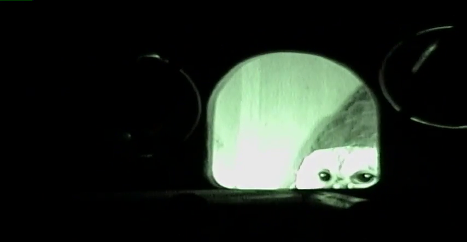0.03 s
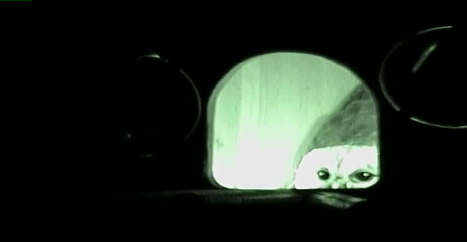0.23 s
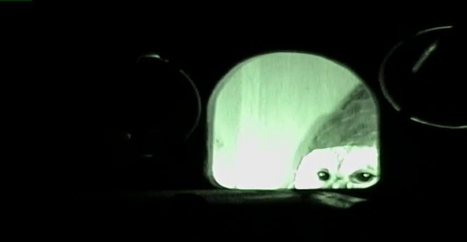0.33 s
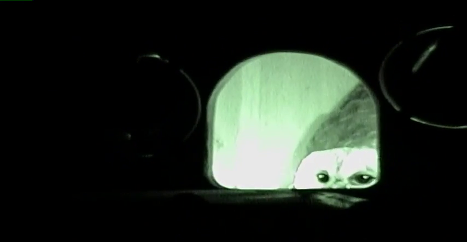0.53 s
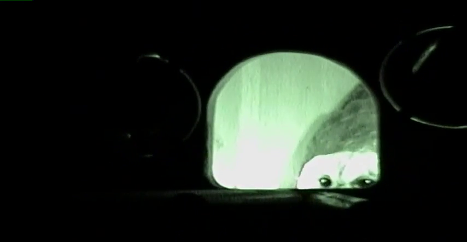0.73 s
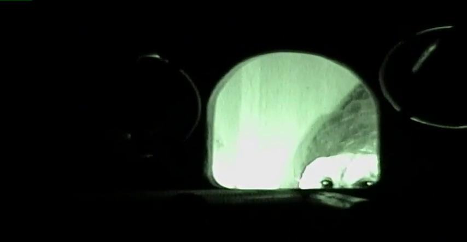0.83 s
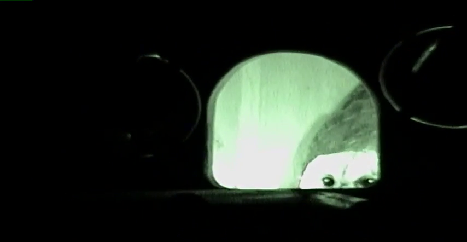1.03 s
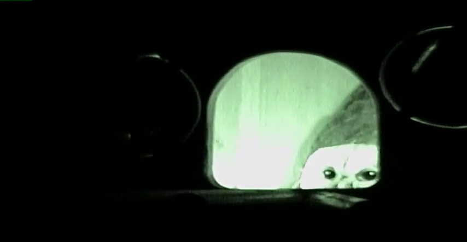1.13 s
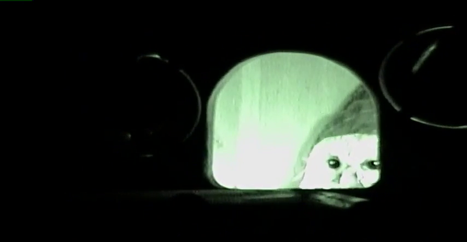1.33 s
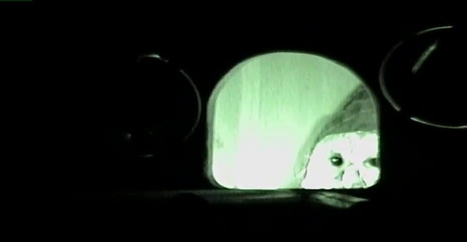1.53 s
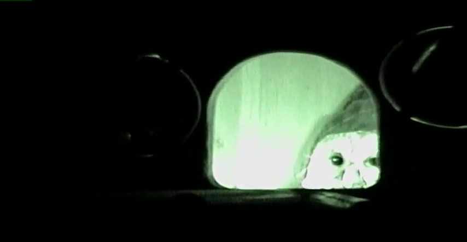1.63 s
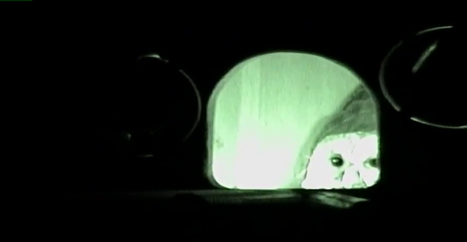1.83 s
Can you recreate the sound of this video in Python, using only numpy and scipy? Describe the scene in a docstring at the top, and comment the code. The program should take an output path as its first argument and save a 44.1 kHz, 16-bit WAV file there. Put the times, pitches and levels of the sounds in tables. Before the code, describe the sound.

An owl hoots right at the microphone in a nest box: one short note, then a longer call that rises, distorts and wavers as it falls. A faint electrical buzz, low rumble and hiss continue underneath.

```python
"""Mains buzz, a low rumble and hiss are there from the start. At 0.2 s an owl hoots right at the
microphone of a nest box: a short arched note, its voice pulses ringing the throat and the box.
At 0.4 s a long call rises and overloads the small narrow-band camera, which squares off the wave.
The call falls away wavering, and after 1 s only the buzz, the rumble and the easing hiss remain."""
import sys
import numpy as np
from scipy import signal
from scipy.fft import rfft, irfft, next_fast_len
from scipy.io import wavfile
from scipy.ndimage import map_coordinates

SR = 44100
rng = np.random.default_rng(int(sys.argv[2]) if len(sys.argv) > 2 else 0)


def file_out(sig):
    """Save sig as 16-bit WAV at sys.argv[1]."""
    # one column per channel
    cols = np.atleast_2d(sig).T
    # limit, then scale
    lim = np.clip(cols, -1, 1)
    pcm = np.round(lim * 32767).astype(np.int16)
    wavfile.write(sys.argv[1], SR, pcm)


N = 83790
TIME = np.arange(N) / SR


def amp(db):
    """Turn decibels into a gain."""
    return 10 ** (np.asarray(db) / 20)


def unit(x):
    """Scale a sound to an average strength (rms) of 1."""
    return x / np.sqrt(np.mean(x ** 2) + 1e-20)


def wobble(rate):
    """A smooth random curve through `rate` points a second."""
    return map_coordinates(rng.standard_normal(int(N * rate / SR) + 4), [TIME * rate])


def filtered(x, response):
    """Scale each frequency of x by the gain response(hz)."""
    size = next_fast_len(N + SR // 2)
    return irfft(rfft(x, size) * response(np.fft.rfftfreq(size, 1 / SR)), size)[:N]


def coloured(x, points):
    """Shape the tone of x along a curve of (f/Hz, level/dB) points."""
    size = 2 ** 17
    hz, db = np.transpose(points)
    curve_db = np.interp(np.log(np.fft.rfftfreq(size, 1 / SR) + 1), np.log(hz), db)
    cepstrum = irfft(np.log(amp(curve_db)))
    # fold it so that the filter rings after a sound, never before
    cepstrum[1:size // 2] *= 2
    cepstrum[size // 2 + 1:] = 0
    return irfft(rfft(x, size) * np.exp(rfft(cepstrum)))[:N]


# the tones in the buzz: multiple of the mains frequency, level/dB
BUZZ_TONES = [(1, -53.5), (2, -75), (3, -55), (5, -56.5), (7, -61.5), (9, -63.5), (11, -69.5), (13, -75),
              (15, -77.5), (17, -74), (19, -75), (21, -74)]

def mains_buzz(mains_hz=60):
    """Mains power adds steady tones at multiples of its frequency."""
    return sum(np.sqrt(2) * amp(db) * np.sin(2 * np.pi * k * mains_hz * TIME) for k, db in BUZZ_TONES)


# the tone of the rumble: f/Hz, relative level/dB
RUMBLE_TONE = [(25, -27), (50, -21.5), (75, -16), (100, -1.5), (130, -1), (170, -8.5), (230, -10),
               (290, -22.5), (600, -40)]

def rumble(level_db=-50.5):
    """Steady deep noise, strongest near 120 Hz."""
    return amp(level_db) * unit(coloured(rng.standard_normal(N), RUMBLE_TONE))


# the tone of the hiss: f/Hz, relative level/dB
HISS_TONE = [(30, -15.5), (300, -1), (600, -2), (1500, -6.5), (3600, -13.5), (5000, -14)]
# how the hiss swells and sinks: t/s, relative level/dB
HISS_SWELL = [(0, 4), (.35, 0.5), (1.0, 3.5), (1.3, -0.5), (1.9, -2.5)]

def hiss(base_db=-55):
    """Soft, wide noise that eases off after the call."""
    swell_db = np.interp(TIME, *np.transpose(HISS_SWELL))
    return amp(base_db + swell_db) * unit(coloured(rng.standard_normal(N), HISS_TONE))


def hoot(rows, waver=0, gruff_below_hz=200, fade_s=0.0021, shimmer_db=0.59):
    """One note: voice pulses, each with a puff of air. Low pitches turn shaky and breathy."""
    times, hz, db = np.transpose(rows)
    pitch = np.interp(TIME, times, hz) + waver
    gruff = 1 / (1 + (pitch / gruff_below_hz) ** 8)  # near 1 when low, near 0 when high
    pitch *= 1 + (0.00088 + 0.028 * gruff) * wobble(250)
    phase = 2 * np.pi * np.cumsum(pitch * (TIME > times[0])) / SR
    pulses = sum(np.cos(k * phase) for k in range(1, 29))
    puffs = unit(rng.standard_normal(N)) * (1 + np.cos(phase)) / 2
    puffs *= np.sqrt(SR / pitch / 2)  # keeps air and pulses in balance at any pitch
    rasp = puffs * (amp(-55) + gruff * amp(-11))
    fade = np.clip(np.minimum(TIME - times[0], times[-1] - TIME) / fade_s, 0, 1)
    loudness = amp(np.interp(TIME, times, db) + shimmer_db * wobble(200))
    return fade * loudness * (pulses + rasp)


# pitch and loudness of the first note: t/s, f/Hz, level/dB
SHORT_NOTE_PATH = [(.209, 184.3, -23), (.223, 196.4, -7), (.236, 223.2, -4), (.25, 260, -1),
                   (.265, 278.8, -2.5), (.287, 235.5, -4.5), (.3, 209.3, -4), (.31, 160.7, -11.5),
                   (.323, 147.7, -10.5), (.332, 140, -33.5)]

def short_note():
    """The owl's voice arches quickly up and down."""
    return hoot(SHORT_NOTE_PATH)


# how throat and box together boost or weaken each frequency: f/Hz, level/dB
THROAT_AND_BOX_TONE = [(50, -44.5), (100, -18.5), (145, -4.5), (190, -14.5), (230, 2.5), (275, 2.5),
                       (320, -4.5), (370, 1), (430, 3), (475, 1.5), (545, -13.5), (590, -12.5), (640, -6.5),
                       (740, -6.5), (830, -9.5), (930, -16.5), (1080, -11.5), (1230, -26.5), (1400, -25),
                       (1900, -44), (2150, -51.5), (2360, -31.5), (2600, -48), (3200, -43.5), (4000, -54),
                       (6000, -65)]

def throat_and_box(pulses):
    """Each pulse is a dip in air pressure that rings the throat and the box."""
    return -coloured(pulses, THROAT_AND_BOX_TONE)


def box_ring(voice, level_db=-27.5, ring_s=0.043, top_hz=553):
    """The wooden box rings on briefly in the bass, dying away by 60 dB in ring_s."""
    t = np.arange(SR // 4) / SR
    tail = rng.standard_normal(len(t)) * 1000 ** (-t / ring_s)
    ring = signal.fftconvolve(voice, tail / np.linalg.norm(tail))[:N]
    return amp(level_db) * filtered(ring, lambda hz: 1 / (1 + (hz / top_hz) ** 6))


# pitch and loudness of the second note: t/s, f/Hz, level/dB
LONG_CALL_PATH = [(.396, 177.2, -18.5), (.411, 193.3, -8.5), (.425, 234.6, -2), (.44, 268.7, -3.5),
                  (.46, 303.9, 2), (.472, 363, 3.5), (.49, 399.9, 3), (.511, 448.7, 7.5), (.53, 464.7, 5),
                  (.594, 477.4, 2.5), (.624, 436.8, 12), (.656, 424.7, 7), (.666, 386.3, 7),
                  (.673, 327.1, 1.5), (.712, 295.6, 6), (.738, 285.4, -4), (.773, 282.9, 5),
                  (.792, 271.8, -3), (.835, 259.9, -1.5), (.87, 238.9, -4), (.9, 228.2, -3),
                  (.922, 216.7, -6), (.931, 158.4, -12.5), (.964, 140.4, -15.5), (.975, 134.4, -38)]

def long_call(waver_start_s=.662, waver_end_s=.93, rate_hz=15.7, depth_hz=16):
    """The owl's voice climbs, then wavers as it falls."""
    wavering = (TIME > waver_start_s) & (TIME < waver_end_s)
    swing = np.sin(2 * np.pi * rate_hz * (TIME - waver_start_s))
    swing = np.tanh(1.3 * swing) / np.tanh(1.3)  # linger on the upper and lower pitch
    return hoot(LONG_CALL_PATH, waver=-depth_hz * swing * wavering)


def amplifier(x, top=.72, hardness=36, drift_s=0.18):
    """The overloaded amplifier flattens the peaks, and its resting point drifts off centre."""
    leak = 1 / (drift_s * SR)
    drift = 0.37 * signal.lfilter([leak], [1, leak - 1], np.abs(x) > top)
    shifted = x + drift
    return shifted / (1 + np.abs(shifted / top) ** hardness) ** (1 / hardness)


def converter(x, sample_hz=8000, band_hz=4026, smooth_hz=3995, top=.695):
    """Cut the treble, sample at a low rate and clip, so overtones fold back down; then smooth."""
    size, count = 3 * SR, 3 * sample_hz  # 3 s at each rate
    hz = np.fft.rfftfreq(size, 1 / SR)
    band = filtered(x, lambda f: 1 / (1 + (f / band_hz) ** 48))
    samples = np.clip(map_coordinates(band, [np.arange(count) * SR / sample_hz]), -top, top)
    mirrored = np.fft.fft(samples)[np.arange(len(hz)) % count]
    return irfft(mirrored / (1 + (hz / smooth_hz) ** 32), size)[:N] * size / count


def crackle(x, top=.706, unsteadiness=.012, top_hz=15800):
    """An unsteady ceiling shaves the tallest ripples off the wave, making an uneven crackle."""
    ceiling = top * (1 + unsteadiness * wobble(300))
    return filtered(np.clip(x, -ceiling, ceiling), lambda hz: hz < top_hz)


def scene():
    """The owl in its box and the quiet background, at one microphone."""
    voice = throat_and_box(short_note() + long_call())
    return (voice + box_ring(voice) + mains_buzz() + hiss() + rumble())[None]


def record(dry):
    """The camera squares off the loud parts, narrows the sound and makes it crackle."""
    return crackle(converter(amplifier(dry[0])))[None]


dry = scene()
out = record(dry)
file_out(out)
```